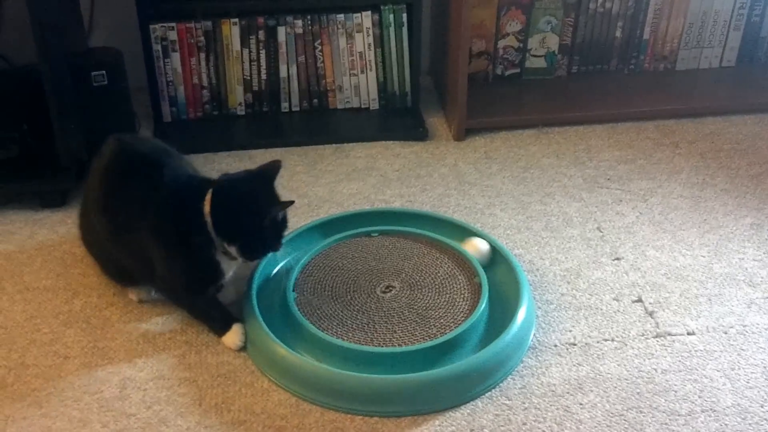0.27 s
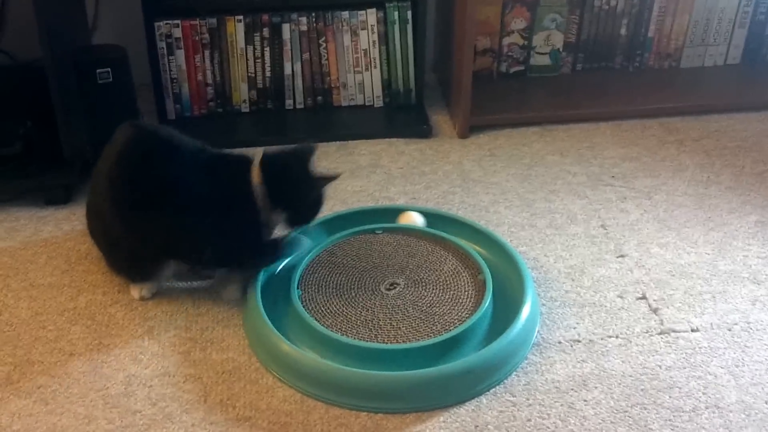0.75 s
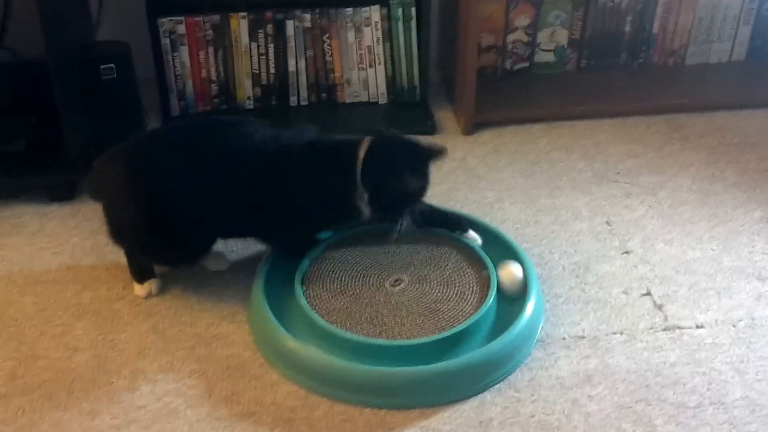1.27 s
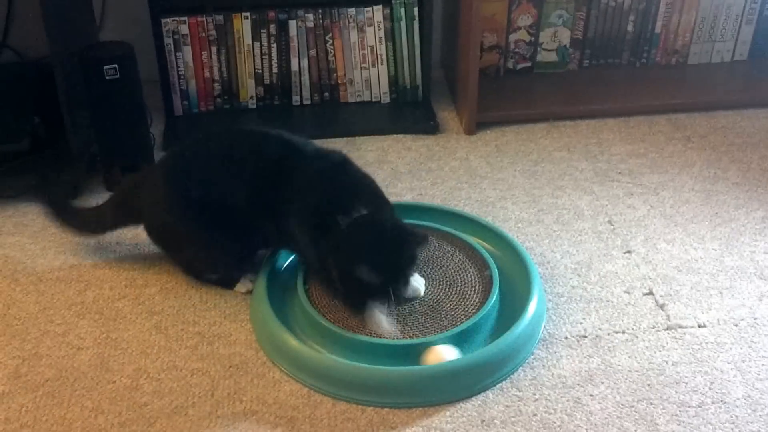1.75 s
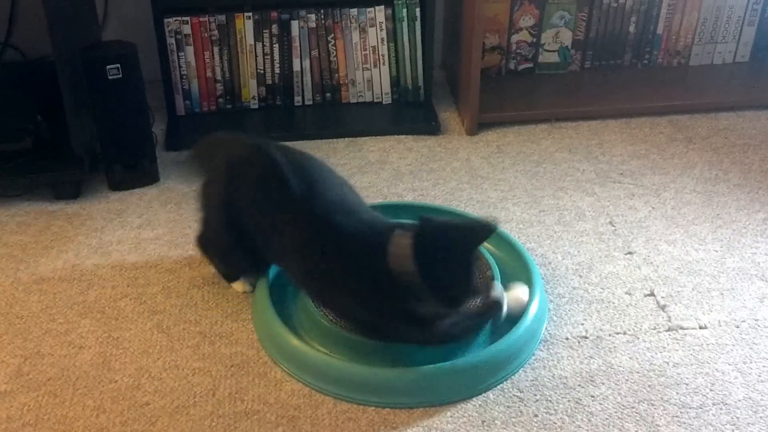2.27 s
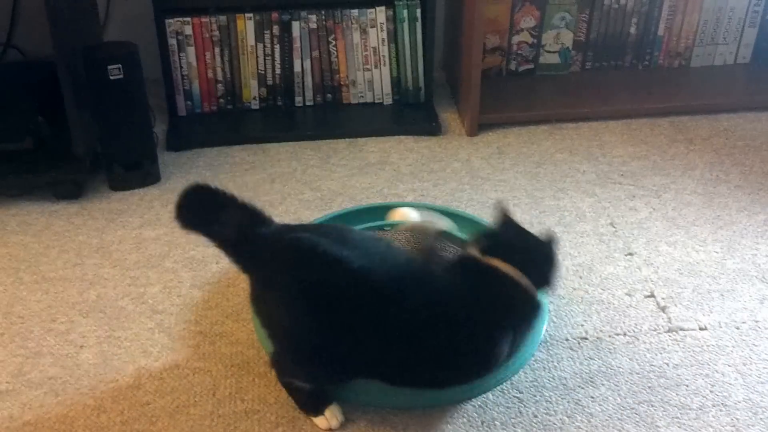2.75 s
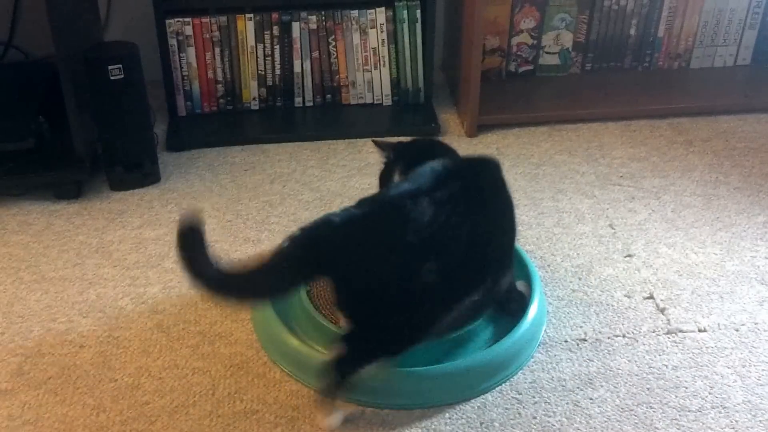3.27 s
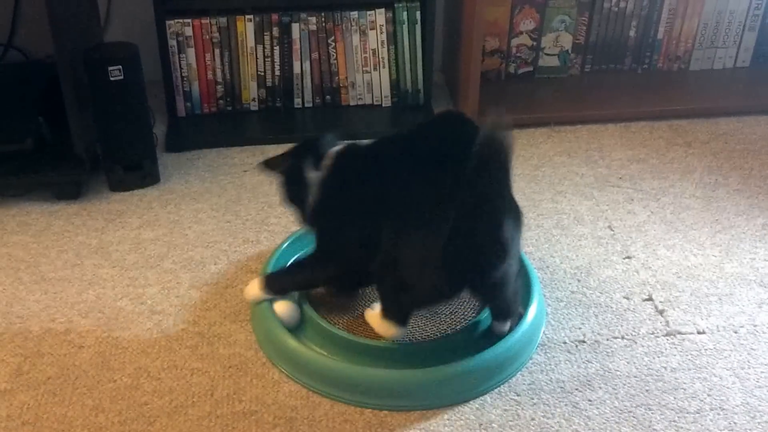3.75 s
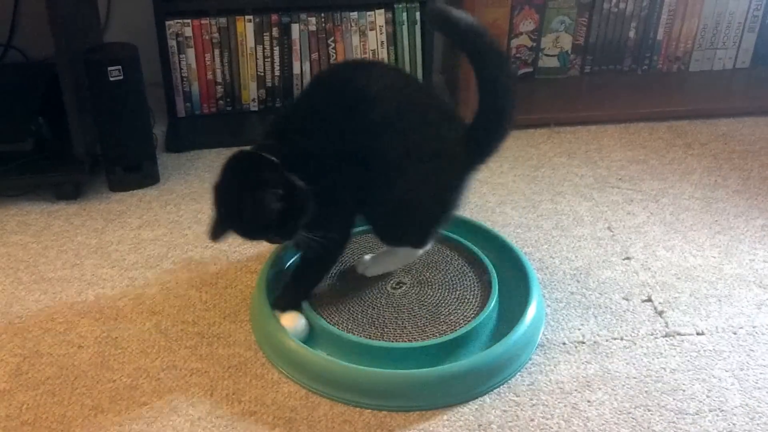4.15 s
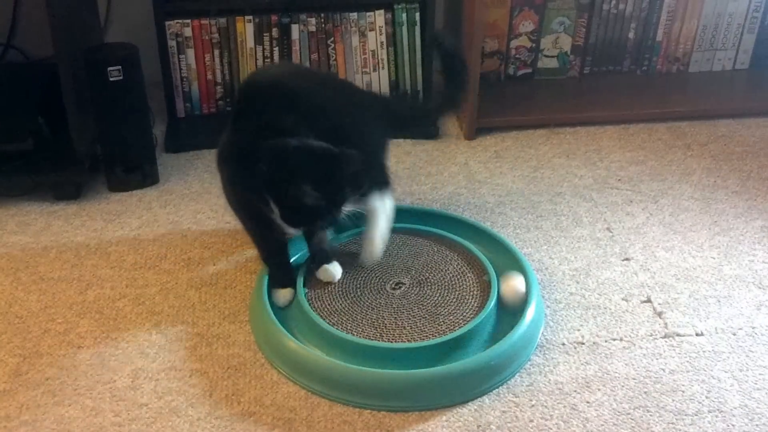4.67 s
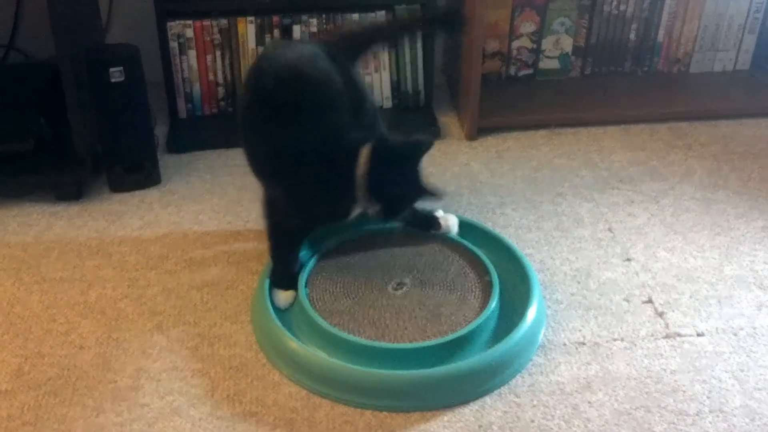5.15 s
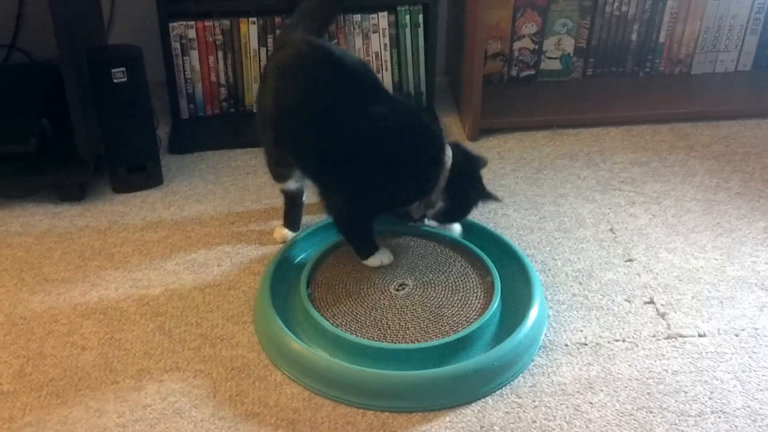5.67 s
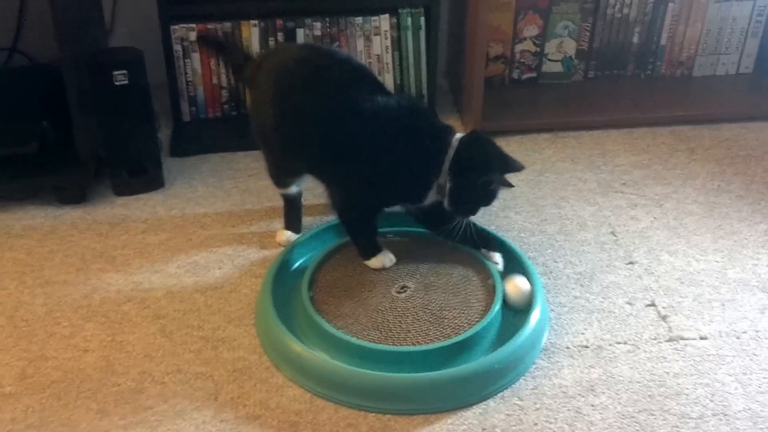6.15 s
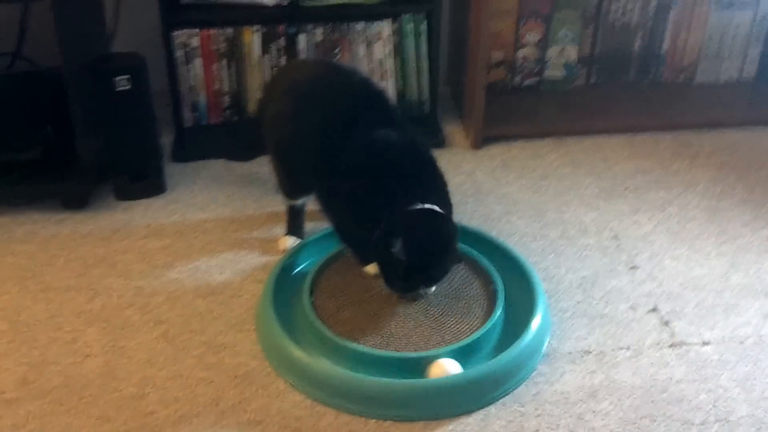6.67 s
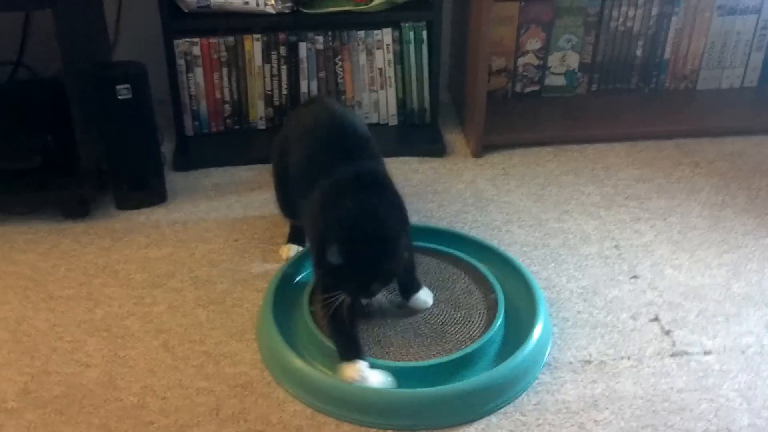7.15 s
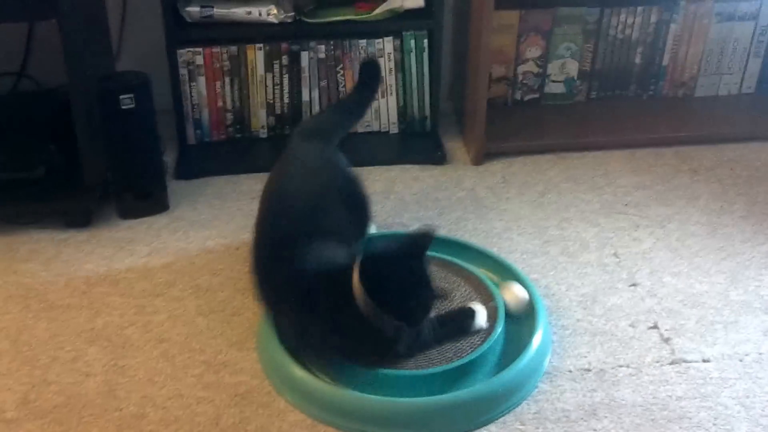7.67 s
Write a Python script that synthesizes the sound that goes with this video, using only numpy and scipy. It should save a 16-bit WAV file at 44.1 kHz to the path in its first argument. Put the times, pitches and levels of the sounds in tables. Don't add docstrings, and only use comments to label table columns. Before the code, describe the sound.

Close stereo pickup in a small carpeted room with a faint fan. A light plastic ball rumbles around a hollow plastic ring, bumping over seams and rapping the walls. A cat bats it, giving sharp clacks, claw ticks, short scrapes and soft paw thuds. The action gets dense around three seconds and again between four and five, thins out for a second, then returns with hard knocks.

```python
import sys
import numpy as np
from scipy import signal
from scipy.fft import rfft, irfft, next_fast_len
from scipy.io import wavfile
from scipy.ndimage import uniform_filter1d

SR = 44100
rng = np.random.default_rng(int(sys.argv[2]) if len(sys.argv) > 2 else 0)


def generate_wav(signal):
    frames = np.transpose(np.atleast_2d(signal))
    scaled = np.clip(frames, -1, 1) * 32767
    pcm = np.round(scaled).astype(np.int16)
    wavfile.write(sys.argv[1], SR, pcm)


def amplitude_ratio(level_db):
    exponent = np.asarray(level_db, float) / 20
    return 10 ** exponent


N = 348831

# f/Hz, width/Hz, level/dB
TRACK_MODES = [(215, 97, -5.5), (290, 56.4, -1.5), (380, 40, -3.5), (485, 98, -4.5), (628, 220, -4),
               (775, 250, -5), (997, 295, -13), (1217, 214, -13.5), (1520, 380, -13)]
# t/s, f/Hz
HOLLOW_NOTE = [(0.0, 383), (0.79, 396), (0.94, 333), (1.03, 401), (1.61, 344), (3.12, 363), (3.21, 364),
               (3.25, 366), (3.87, 358), (3.98, 380), (5.9, 350), (6.16, 411), (7.55, 378), (7.59, 354),
               (7.81, 392), (7.9, 383)]
# t/s, level/dB
ROLL_LEVEL = [(0, -45), (.55, -48.5), (1.01, -49.5), (1.25, -39.5), (1.74, -46), (2.04, -41), (2.14, -46),
              (2.4, -42.5), (2.98, -41), (3.17, -56), (3.6, -44), (4.31, -52.5), (4.37, -38), (5.09, -46),
              (5.17, -55), (5.55, -57), (6.21, -45), (7.91, -45)]
# t/s, level/dB
SHOVES = [(1.06, -35), (1.32, -40), (1.56, -32), (2.1, -50), (3.11, -44), (3.3, -48), (3.56, -54),
          (3.93, -36), (4.21, -59), (4.74, -32.5), (4.85, -40), (6.43, -51), (7.36, -34.5), (7.54, -38.5),
          (7.62, -36), (7.8, -41), (7.88, -53)]

# t/s, peak level/dB, f/Hz, t60/s
BUMPS = [(.386, -28.5, 377, 0.079), (.526, -52, 350, 0.055), (.65, -18, 485, 0.019),
         (1.238, -28, 410, 0.077), (1.821, -25.5, 380, 0.16), (2.067, -18, 368.7, 0.2),
         (2.21, -25, 390, 0.11), (2.749, -16.5, 442, 0.059), (3.048, -20.5, 430, 0.071),
         (3.275, -20, 470, 0.056), (3.509, -21.5, 463, 0.051), (3.84, -15.5, 336, 0.088),
         (3.931, -24.5, 385, 0.06), (3.993, -23, 403, 0.23), (4.193, -23, 378, 0.21),
         (5.056, -29, 474, 0.048), (5.431, -20.5, 265, 0.046), (6.096, -17, 384, 0.017),
         (6.172, -21.5, 367, 0.04), (6.189, -21.5, 450, 0.054), (6.417, -28.5, 421, 0.13),
         (6.573, -24.5, 394, 0.15), (6.66, -26, 392, 0.064), (6.887, -17, 734, 0.036),
         (7.781, -12, 460, 0.033), (7.859, -19.5, 433, 0.025)]
# t/s, peak level/dB, f/Hz, t60/s
RAPS = [(.126, -30, 340, 0.062), (.567, -22, 405, 0.032), (1.038, -28, 507, .03), (1.054, -22, 600, 0.027),
        (1.164, -26.5, 470, 0.11), (1.295, -14, 476, 0.047), (1.538, -22.5, 330, 0.27),
        (1.667, -26.5, 339.6, 0.35), (2.251, -19.5, 282, 0.036), (2.596, -24, 315, 0.069),
        (2.794, -18, 720, 0.023), (2.971, -30, 438, 0.075), (3.483, -23, 760, 0.022),
        (3.681, -22, 326, 0.066), (4.286, -55, 390, .059), (4.411, -37, 416, 0.087),
        (4.43, -16, 376, 0.021), (4.462, -26, 690, 0.016), (4.542, -29, 362, 0.19), (4.696, -21, 323, 0.14),
        (5.078, -23, 302, 0.056), (5.327, -28, 430, 0.059), (5.988, -19.5, 330, 0.14),
        (7.325, -28, 520, 0.025),
        (2.156, -42, 367, .05), (2.513, -33, 400, 0.022), (2.535, -22, 366, 0.025),
         (2.927, -24, 396, 0.033), (3.445, -25, 280, 0.049), (3.773, -31, 630, 0.028),
         (4.076, -26, 398, 0.066), (4.586, -17.5, 596, 0.036), (4.673, -28, 440, 0.024),
         (5.442, -26, 390, 0.055), (5.483, -32, 300, 0.03), (6.06, -26.5, 384, 0.22),
         (6.267, -25.5, 348, 0.076), (6.68, -25.5, 379, 0.09), (6.767, -20.5, 477, 0.019),
         (7.473, -27.5, 376, 0.077), (7.549, -23, 479, 0.04)]
# t/s, peak level/dB, f/Hz, bright part level/dB, t60/s
BATS = [(1.906, -25.5, 395, -19, 0.26), (2.081, -23.5, 580, -6, 0.016), (2.356, -24, 330, -23, 0.31),
        (3.077, -12, 394, -17, 0.062), (3.397, -35, 235, -10, 0.17), (4.345, -22.5, 393, -14.5, 0.15),
        (4.734, -13, 750, -17, 0.035), (4.827, -19, 455, -19.5, 0.046), (6.492, -31, 650, -17, 0.083),
        (6.7196, -35, 700, -8, 0.013), (6.7484, -23, 503.4, -14, 0.013), (7.176, -22, 385, -14.5, 0.048),
        (7.54, -19, 544, -17.5, 0.033), (7.573, -13, 343, -21, 0.084)]
# t/s, peak level/dB, f/Hz, bright part level/dB, t60/s
PAWFALLS = [
    (3.562, -25.5, 269, -26, 0.078),
    (5.459, -28, 215, -49, 0.073),
    (7.338, -27, 393, -16.5, 0.11),
    (7.894, -18, 330, -45, 0.25),
]
# t/s, peak level/dB, f/Hz, hold/s
THUMPS = [(1.572, -31, 335, .012), (1.598, -29, 300, 0.012), (2.748, -29, 336, .012),
          (3.118, -27, 390, 0.016), (3.276, -31, 484, 0.012), (3.935, -26.5, 390, 0.015),
          (5.092, -30, 416, 0.0099), (5.4317, -21, 359, 0.019), (5.432, -33, 1530, 0.0048),
          (5.462, -30.5, 215, 0.03), (6.189, -26.5, 520, 0.0086), (4.658, -33, 387, 0.026),
          (1.058, -28.5, 517, 0.016), (4.375, -26, 417, .008), (4.448, -31, 446, 0.0075),
          (3.092, -28, 391, 0.028), (4.698, -28, 380, 0.01), (7.801, -31, 424, 0.034),
          (7.3395, -21.5, 396, 0.011), (7.362, -34, 324, 0.018), (7.781, -24.5, 393, 0.021)]
# t/s, peak level/dB, f/Hz
PINGS = [
    (2.1, -40, 2400),
    (3.1, -31, 1900),
    (6.5, -30, 2700),
    (1, -38, 690),
    (1.2, -44, 5470),
    (4.346, -36.5, 4600),
    (4.366, -32, 4400),
    (3, -35, 3600),
    (4.464, -28, 4500),
    (4.5295, -34, 4400),
]

# t/s, peak level/dB, treble level/dB
SMACKS = [
    (3.074, -7.5, 4),
    (3.0767, -7, 0),
    (6.1905, -26, 2),
          (1.0563, -13, 4), (1.3537, -21, 4), (2.0849, -14, 0), (4.4316, -20, 2), (4.4645, -12, 3),
         (4.546, -15, 0), (4.7349, -10, 0), (4.8289, -16, 3), (7.3271, -17, 0), (5.0595, -21, 2),
         (7.1765, -18, 0), (7.199, -21, 3), (2.7962, -18, 2), (1.0405, -22, 2), (2.8585, -22, 0),
         (2.9725, -22, 0), (7.5761, -14, 3), (4.699, -20, 0)]
# f/Hz, level/dB
SMACK_TONE = [(150, -26), (400, -2), (800, 1.5), (1600, -19.5), (2500, -6), (6000, -39)]
# t/s, peak level/dB, treble level/dB
FLICKS = [
    (2.4412, -48, 17),
    (6.7228, -12, 14.5),
    (6.75, -14.5, -1.5),
]
# f/Hz, level/dB
FLICK_TONE = [(400, -25), (1200, 16), (2200, 14), (4000, -5), (7000, -16), (12000, -43)]

# t/s, peak level/dB, treble tilt/dB
TAPS = [(.398, -46.5, -10), (1.24, -45, -24), (1.297, -40.5, -3), (1.354, -47, -41), (1.711, -34.5, -19),
        (1.72, -59, -34), (2.441, -32.5, -29), (2.933, -51, -16), (3.074, -46, 0), (3.5466, -45.5, -13.5),
        (4.11, -58.5, 13), (4.371, -55, -22), (4.714, -44, -36), (4.7333, -41, 5), (4.8796, -52, -3),
        (5.299, -47, -5), (5.4313, -45, -17), (6.7216, -50, -23), (6.7494, -56, -31), (6.825, -53, -5),
        (7.8146, -57, -28), (7.859, -47, -16.5),
        (1.038, -46, -8), (1.334, -60, 8), (2.089, -46, -15), (2.7506, -52, -11), (2.794, -46, -9),
           (4.462, -43, -23), (4.529, -60, -34), (4.5873, -56, -16), (4.868, -51, 0), (4.985, -47, -11),
           (5.905, -58, 3), (6.17, -54, 0), (7.175, -50, -8.5), (7.576, -39, -16), (7.651, -51, -10)]
# t/s, peak level/dB, treble tilt/dB
CATCHES = [(.471, -52, -7), (1.335, -66, -5), (1.672, -49.5, -26), (1.906, -39.5, -32), (2.083, -36.5, -21),
           (2.32, -44, -24), (2.374, -39.5, -27), (2.467, -34, -54), (2.534, -42, -32), (2.769, -48, -16),
           (3.397, -37, -21), (3.483, -46, -9.5), (3.767, -36, -30), (3.853, -40, 1), (4.343, -46, -36),
           (4.4083, -33, -13), (4.829, -66, -15), (4.966, -41.5, -29), (6.1268, -50, -15), (6.762, -54, -4),
           (6.937, -49.5, -36), (7.5397, -40.5, -26), (7.753, -52, -26)]
# t/s, peak level/dB, treble tilt/dB, scuffing tail level/dB, tail length/s
SWIPES = [
    (1.024, -52, 3, 12.0, 0.015),
    (1.535, -49, -7, 1, 0.052),
    (1.881, -54, 1, 14, 0.1),
    (2.205, -50, -18, 12.0, 0.048),
    (4.071, -51, -19.5, 6, 0.06),
    (7.154, -49, -20, 15, 0.03),
    (7.186, -59, 1, 12.0, 0.018),
]
# t/s, peak level/dB, brightest f/Hz, length/s
RASPS = [(1.2955, -32, 8500, 0.0028), (1.334, -18, 14000, 0.0021), (1.709, -14.5, 4500, 0.0046),
         (1.717, -28, 9000, 0.0048), (2.0783, -22, 7960, .004), (2.772, -27.5, 4600, 0.0036),
         (2.943, -27, 3600, .004), (3.847, -32, 10000, 0.054), (4.109, -23, 10500, 0.0036),
         (4.406, -21, 4000, 0.021), (4.8787, -15.5, 11000, .003), (4.967, -29, 4200, 0.0072),
         (4.99, -37, 4000, 0.01506), (5.3, -37, 5800, 0.0045), (7.188, -30, 13000, 0.017),
         (7.745, -27, 7800, 0.033), (7.81, -32, 4000, 0.018), (7.868, -33, 11000, .004),
         (1.71, -30, 2000, 0.055), (2.464, -29, 2200, 0.035), (4.408, -21, 2100, 0.022),
         (2.32, -26, 4100, 0.0055), (6.7218, -35, 6500, 0.0015), (3.68, -33, 9800, .02),
         (2.092, -30, 4500, .004), (7.157, -32.5, 28000, .18), (3.398, -28, 5100, 0.0026),
         (6.748, -37, 4600, .002), (4.732, -31, 10000, .005)]

# t/s, level/dB
CLAWING = [(0, -56), (.55, -72.5), (1.0, -58), (1.07, -48), (1.13, -55), (1.38, -50.5), (1.43, -58),
           (1.52, -57), (1.74, -58), (2.05, -56), (2.2, -52), (3.08, -53), (3.2, -69), (3.57, -53.5),
           (4.2, -49), (4.8, -52), (5.09, -54.5), (5.2, -90), (5.55, -62), (6.43, -56.5), (7.05, -63.5)]
# t/s, level/dB, claws level/dB
BRUSHES = [(1.04, -48, -60), (1.22, -59, -52), (2.16, -42.5, -50.5), (2.4, -69, -50), (3.04, -48, -55),
           (3.94, -51.5, -68), (4.22, -56, -51), (4.37, -72, -59), (4.77, -66, -42.5), (7.2, -43, -52),
           (7.31, -44, -50.5), (7.58, -62, -44.5), (7.69, -57, -45), (7.8, -63, -45.5)]
# f/Hz, level/dB
SCRAPE_TONE = [(700, 1), (1500, -6), (2300, 2), (3300, -3), (4500, -2), (6500, -6.5), (16000, -6)]
# f/Hz, level/dB
SWISH_TONE = [(2500, -15), (5000, -3), (7500, -3), (9700, -1), (12000, -4), (15000, 1)]

# f/Hz, level/dB, t60/s
BELL_MODES = [(9885, 0, .26), (13750, -3, .13)]
# t/s, level/dB
TINKLES = [
    (6.479, -54),
    (6.506, -44),
    (6.54, -52),
    (6.9, -51),
]
# t/s, level/dB
STEPS = [(1.01, -56), (1.3, -51), (1.56, -54), (2.0, -59), (2.14, -46.5), (2.6, -45), (2.95, -50),
         (3.3, -51), (3.56, -48), (3.9, -42), (4.21, -60), (4.37, -39.5), (4.8, -65), (5.44, -61),
         (6.2, -52), (6.43, -56), (7.2, -48), (7.8, -39.5)]

# f/Hz, level/dB
FAN_AIR = [(60, -35), (110, -13.5), (200, 2), (400, -7), (800, -3.5), (1500, -12.5), (3000, -14.5),
           (5000, -22), (7500, -29.5), (12000, -29.5), (15300, -23.5)]
# f/Hz, width/Hz, level/dB
FAN_TONES = [(220.2, 27.5, -48), (629.8, 49, -52.5), (1246, 36, -59.5)]
# f/Hz, t60/s
ROOM_DECAY = [(200, 0.17), (1000, 0.33), (4000, 0.084), (15000, 0.017)]
PORT_LEADS = [4.99, 8.85, 3.32]


def evened(x):
    return x / np.sqrt(np.mean(x ** 2) + 1e-20)


def read(points, hz):
    f, value = np.transpose(points)
    return np.interp(np.log(hz + 1), np.log(f + 1), value)


def colour(x, points):
    n = next_fast_len(x.shape[-1])
    gain = amplitude_ratio(read(points, np.fft.rfftfreq(n, 1 / SR)))
    return irfft(rfft(x, n) * gain, n)[..., :x.shape[-1]]


def add(mix, s, sound):
    part = mix[round(s * SR):][:len(sound)]
    part += sound[:len(part)]


def ring(x, hz, width):
    return signal.lfilter(*signal.iirpeak(hz, hz / width, SR), x)


def glide(x, hz, width):
    turn = np.exp(2j * np.pi * np.cumsum(hz) / SR)
    r = np.exp(-np.pi * width / SR)
    return 2 * (turn * signal.lfilter([1 - r], [1, -r], x / turn)).real


def grains(per_s, spread_db):
    size = amplitude_ratio(spread_db * np.minimum(rng.exponential(1, N), 4)) * rng.standard_normal(N)
    return size * (rng.random(N) < per_s / SR)


def follow(curve):
    return amplitude_ratio(np.interp(np.arange(N) / SR, *np.transpose(curve)))


def swells(events, rise, fall):
    t = np.arange(0, N + 64, 64) / SR
    times, levels = np.transpose(events)[:2]
    late = t[:, None] - times
    peak_db = levels + np.minimum(rise * late, -fall * late)
    return np.interp(np.arange(N) / SR, t, amplitude_ratio(peak_db.max(1)))


def diffuse(pair):
    port_gap = 19
    n = next_fast_len(pair.shape[-1])
    a, b = rfft(pair, n)
    same = np.sinc(2 * np.fft.rfftfreq(n) * port_gap)
    return irfft([a, same * a + np.sqrt(1 - same ** 2) * b], n)[:, :pair.shape[-1]]


def at_ports(x):
    return np.array([x, np.roll(x, 6)])


def rolling():
    bumps = grains(600, 3.6)
    drift = np.interp(np.arange(N) / SR, *np.transpose(HOLLOW_NOTE)) / TRACK_MODES[2][0]
    body = np.zeros(N)
    for k, (f, width, db) in enumerate(TRACK_MODES):
        mode = glide(bumps, f * drift, width) if k in (1, 2) else ring(bumps, f, width)
        body += (-1) ** k * amplitude_ratio(db) * evened(mode)
    return np.hypot(follow(ROLL_LEVEL), swells(SHOVES, rise=440, fall=770)) * evened(body)


def knocks():
    uneven_db, detuning = 6, 0.0764
    bump_bright_db, rap_bright_db = -30.5, -24
    out, t = np.zeros(N), np.arange(SR // 4) / SR
    blows = BATS + PAWFALLS
    for rows, bright_db in ((BUMPS, bump_bright_db), (RAPS, rap_bright_db)):
        blows = blows + [(s, db, hz, bright_db, t60) for s, db, hz, t60 in rows]
    for s, db, hz, bright_db, t60 in blows:
        sound = np.sin(2 * np.pi * hz * t)
        for f, _, mode_db in TRACK_MODES:
            share, detune = rng.standard_normal(2)
            level = amplitude_ratio(mode_db - 5.5 + uneven_db * np.tanh(share))
            decay = amplitude_ratio(-60 * t / t60 * f / 900)
            sound += level * np.sin(2 * np.pi * f * (1 + detuning * detune) * t) * decay
        attack = 1 - np.exp(-t / 0.0009)
        sound *= (amplitude_ratio(-60 * t / max(t60, .02)) + 0.24 * np.exp(-t / 0.0011)) * attack
        contact = np.exp(-t / 0.0016) + 0.54 * np.exp(-(t / (0.18 * t60 + 0.025)) ** 2)
        crack = ring(ring(rng.standard_normal(len(t)) * contact, 730.0, 1470.0), 860.0, 2800.0)
        bright = amplitude_ratio(bright_db + 16.0) * crack / abs(crack).max()
        add(out, s + .0015, amplitude_ratio(db) * (sound / abs(sound).max() + bright))
    return out


def thumps():
    rise_s, overtone, overtone_db, sag = 0.0026, 2.2, -17.5, 0.066
    out, t = np.zeros(N), np.arange(SR // 12) / SR
    for s, db, hz, hold in THUMPS:
        turn = 2 * np.pi * hz * t * (1 - sag * t / hold)
        note = np.sin(turn) + amplitude_ratio(overtone_db) * np.sin(overtone * turn)
        add(out, s, -amplitude_ratio(db) * note * (1 - np.exp(-t / rise_s)) * np.exp(-(t / hold) ** 3))
    return at_ports(out)


def pings():
    t60, rise_s = 0.014, .0012
    out, t = np.zeros(N), np.arange(SR // 20) / SR
    for s, db, hz in PINGS:
        add(out, s, amplitude_ratio(db - 60 * t / t60) * np.minimum(t / rise_s, 1) * np.sin(2 * np.pi * hz * t))
    return out


def flicks():
    out, click = np.zeros(N), -np.eye(1, 512, 256)[0]
    for rows, tone in ((FLICKS, FLICK_TONE), (SMACKS, SMACK_TONE)):
        for s, db, treble_db in rows:
            spike = colour(colour(click, tone), [(1500, 0), (4000, treble_db)])
            add(out, s - 256 / SR, amplitude_ratio(db) * spike / abs(spike).max())
    return at_ports(out)


def ticks():
    tap_snap_s, catch_snap_s = .0008, .0018
    tap_tail, catch_tail = (-20.5, 0.016), (-17.5, 0.042)  # level/dB, length/s
    snaps = [row + tap_tail + (tap_snap_s,) for row in TAPS]
    snaps += [row + catch_tail + (catch_snap_s,) for row in CATCHES]
    snaps += [row + (catch_snap_s,) for row in SWIPES]
    out, t = np.zeros(N), np.arange(SR // 6) / SR
    for s, db, tilt_db, tail_db, length, snap_s in snaps:
        snap = np.exp(-t / snap_s) * (1 - np.exp(-t / .0003))
        drag = np.exp(-(t / max(length, .01)) ** 2) * (1 - np.exp(-t / .006))
        burst = rng.standard_normal(len(t)) * (snap + amplitude_ratio(tail_db) * drag)
        tone = [(900, -20.0), (2200, -5.0), (3300, -5 + 0.18 * tilt_db), (4700, 0.3 * tilt_db),
                (8000, tilt_db + 3.5), (15500, tilt_db)]
        sound = colour(np.pad(burst, (64, 0)), tone)
        add(out, s - 64 / SR, amplitude_ratio(db) * sound / abs(sound).max())
    return out


def rasps():
    out, t = np.zeros(N), np.arange(SR // 5) / SR
    for s, db, hz, length in RASPS:
        hiss, grit = rng.standard_normal((2, len(t)))
        shape = np.sin(np.pi * np.sqrt(np.minimum(t / length, 1)))
        burst = np.pad(hiss * (1 + .5 * abs(grit)) * shape, (64, 0))
        burst = colour(burst, [(hz / 4, -14), (hz, 0), (2 * hz, -8)])
        add(out, s - 64 / SR, amplitude_ratio(db) * burst / abs(burst).max())
    return at_ports(out)


def scuffing():
    rise, fall = 114, 118
    dragged = [(s, claws_db) for s, _, claws_db in BRUSHES]
    claws = np.hypot(follow(CLAWING), swells(dragged, rise, fall))
    fur = amplitude_ratio(-91) + swells(BRUSHES, rise, fall)
    scrape = evened(colour(grains(1800, 2.6), SCRAPE_TONE))
    swish = evened(colour(grains(2700, 2.7), SWISH_TONE))
    return claws * scrape + fur * swish


def flicker(flicker_db):
    steps = evened(uniform_filter1d(rng.standard_normal(N // 256 + 2), size=10))
    return amplitude_ratio(flicker_db * np.interp(np.arange(N) / 256, np.arange(len(steps)), steps))


def bell():
    out, t = np.zeros(N), np.arange(SR // 3) / SR
    for s, db in TINKLES:
        for f, mode_db, t60 in BELL_MODES:
            add(out, s, amplitude_ratio(db + mode_db - 60 * t / t60) * np.sin(2 * np.pi * f * t))
    return out


def paws():
    weight = amplitude_ratio(-56.5) + swells(STEPS, rise=93, fall=76)
    thud = grains(250, 0.7) + 3.1 * rng.standard_normal((2, N))
    thud = colour(thud, [(20, -12), (90, 11.5), (160, 9.0), (400, -76)])
    through_floor = amplitude_ratio(-14.5) * thud[::-1, ::-1]
    return amplitude_ratio(1.5) * weight * evened(diffuse(thud) + through_floor)


def fan():
    air, tones = rng.standard_normal((2, 2, N))
    hum = sum(amplitude_ratio(db) * evened(ring(ring(tones, f, w), f, w)) for f, w, db in FAN_TONES)
    return diffuse(amplitude_ratio(-45.5) * evened(colour(air, FAN_AIR)) + hum)


def room(x, wet_db):
    n, step = SR // 3, SR // 5
    x, out = np.pad(x, (step, 2 * step)), np.zeros((2, N + 4 * step + n))
    fade = np.sin(np.pi * np.arange(2 * step) / (2 * step))
    for k in range(N // step + 2):
        hz, t, z = signal.stft(rng.standard_normal((2, n)), SR, nperseg=256)
        decay = amplitude_ratio(-60 * t / read(ROOM_DECAY, hz)[:, None])
        tail = signal.istft(z * decay, SR, nperseg=256)[1]
        tail = diffuse(tail / np.linalg.norm(tail[0]))
        path = np.pad(tail, ((0, 0), (250, 0))) * amplitude_ratio(wet_db)
        leads = np.array([[0], [PORT_LEADS[k % 3]]])
        path[:, :64] += np.sinc(np.arange(64) - 32 - leads) * np.hanning(64)
        heard = signal.fftconvolve(x[None, k * step:(k + 2) * step] * fade, path, axes=1)
        out[:, k * step:k * step + heard.shape[1]] += heard
    return out[:, step + 32:step + 32 + N]


def scene():
    hits = amplitude_ratio(-5.0) * knocks() + amplitude_ratio(17.5) * ticks() + bell() + pings()
    friction = amplitude_ratio(-7.0) * rolling() + amplitude_ratio(-6.0) * scuffing() * flicker(flicker_db=4.5)
    close = flicks() + thumps() + rasps()
    return room(hits, wet_db=-8) + room(friction, wet_db=7.0) + close + paws() + fan()


def roll_off(x):
    return signal.sosfilt(signal.butter(12, 16980, fs=SR, output="sos"), x)


def record(dry):
    delay = 16
    ports = dry * amplitude_ratio(np.array([[1], [0]]))
    steered = ports - np.pad(ports[::-1], ((0, 0), (delay, 0)))[:, :N]
    lifted = signal.lfilter([1, -np.exp(-1 / delay)], [1, -.998], steered)
    response = [(30, -19.5), (65, -27.5), (105, -12.0), (170, -3.0), (15650, -8.5), (15850, -1),
                (16400, -32), (16800, -67)]
    mix = colour(lifted, response)
    return roll_off(mix)


dry = scene()
out = record(dry)
generate_wav(out)
```